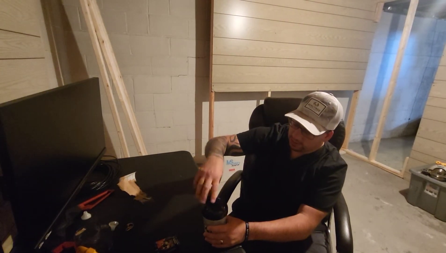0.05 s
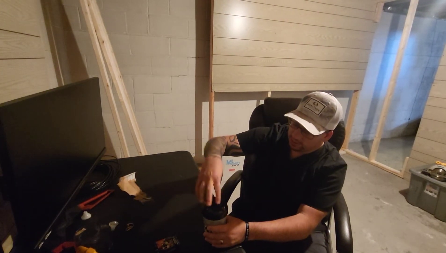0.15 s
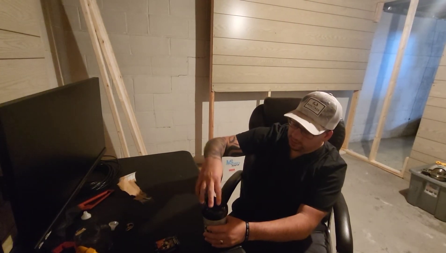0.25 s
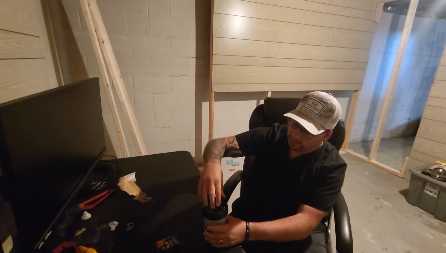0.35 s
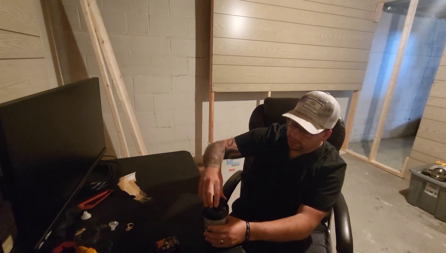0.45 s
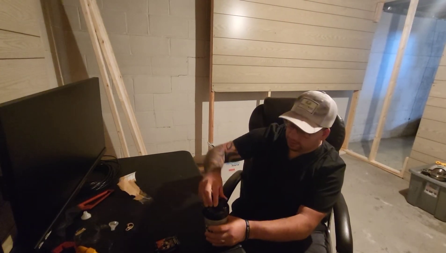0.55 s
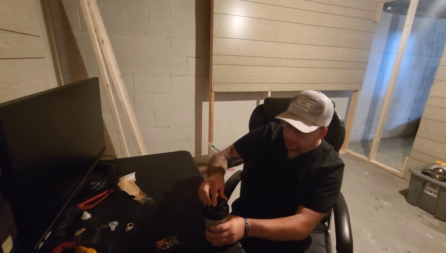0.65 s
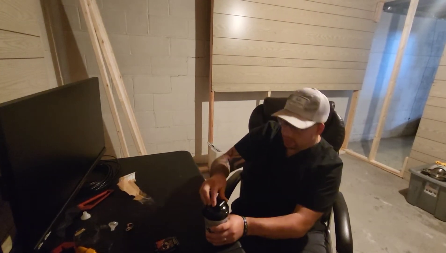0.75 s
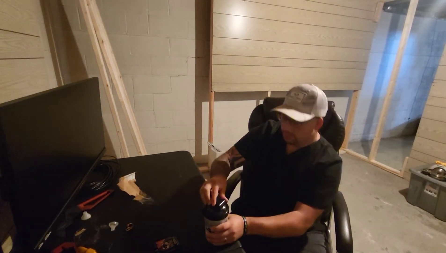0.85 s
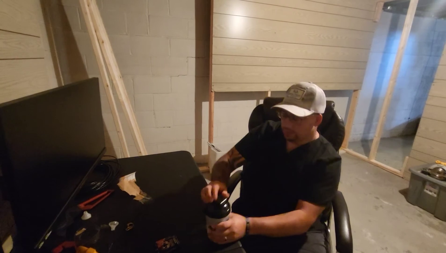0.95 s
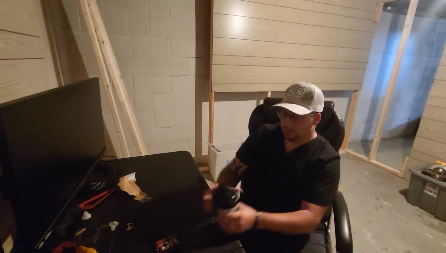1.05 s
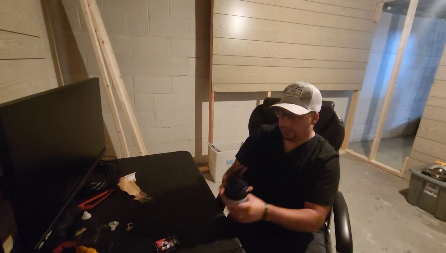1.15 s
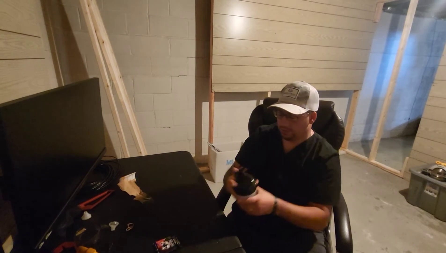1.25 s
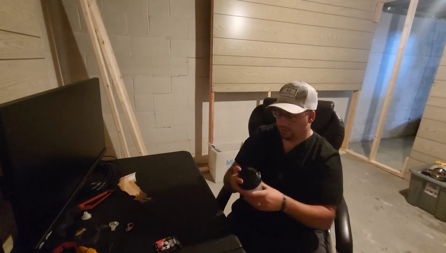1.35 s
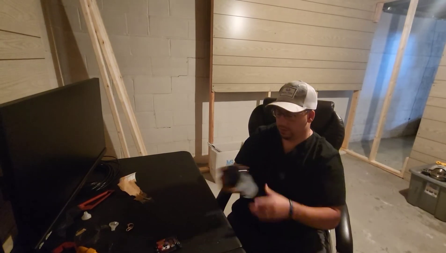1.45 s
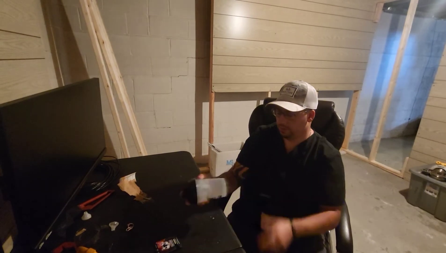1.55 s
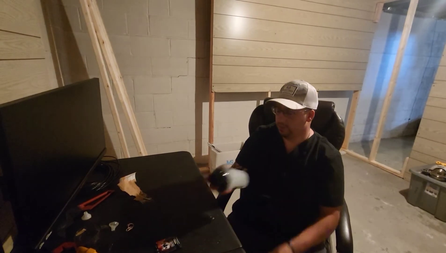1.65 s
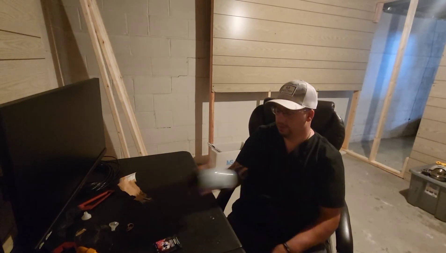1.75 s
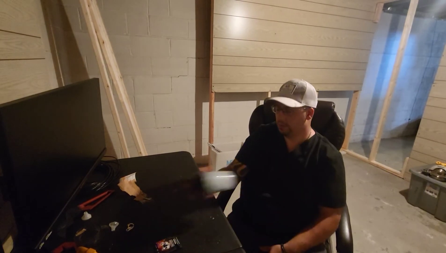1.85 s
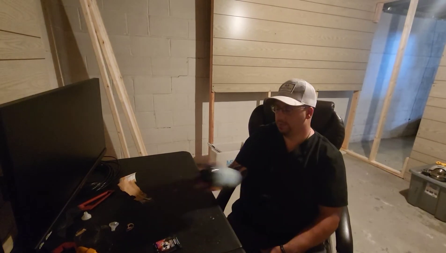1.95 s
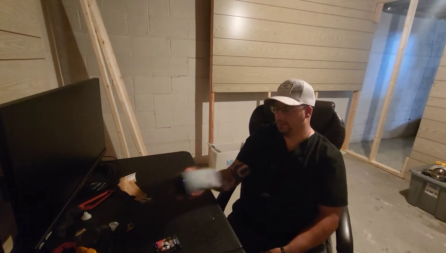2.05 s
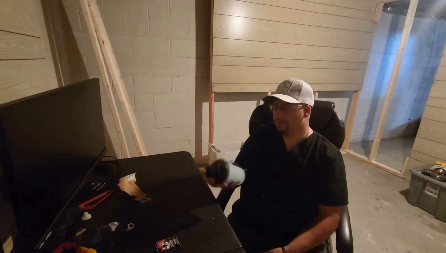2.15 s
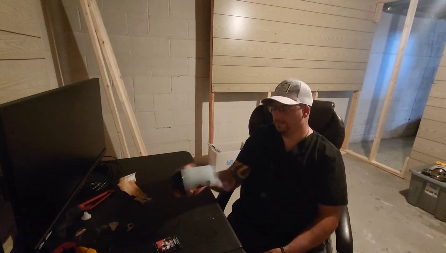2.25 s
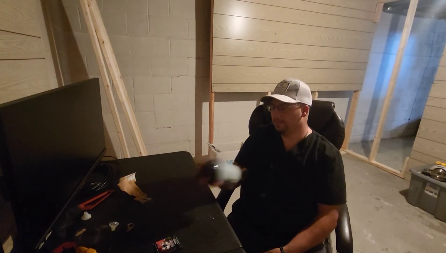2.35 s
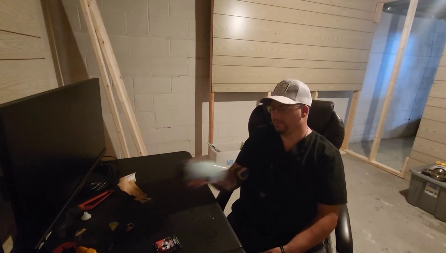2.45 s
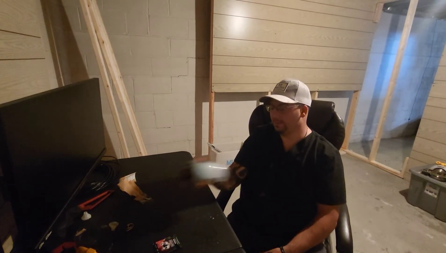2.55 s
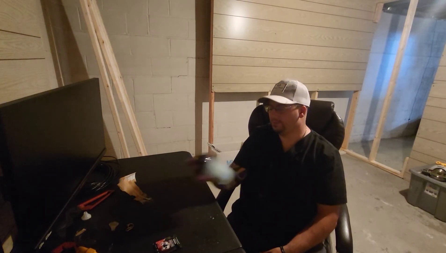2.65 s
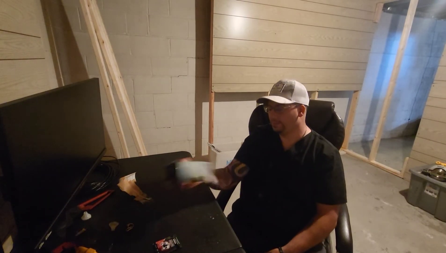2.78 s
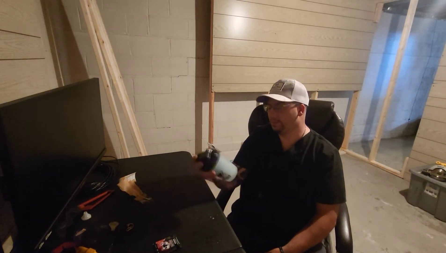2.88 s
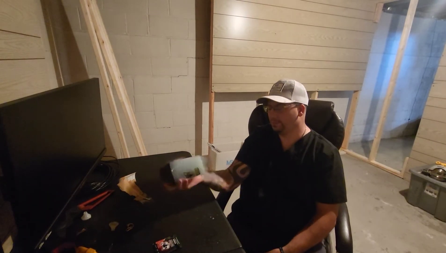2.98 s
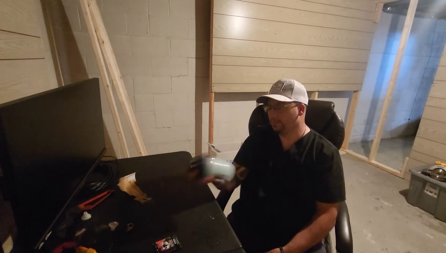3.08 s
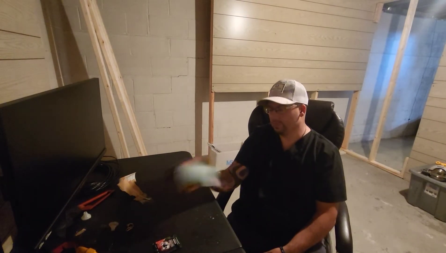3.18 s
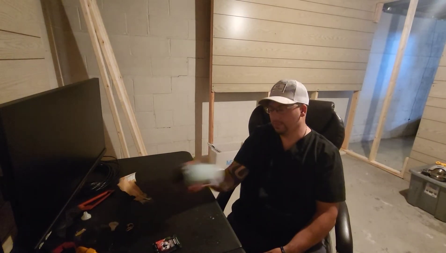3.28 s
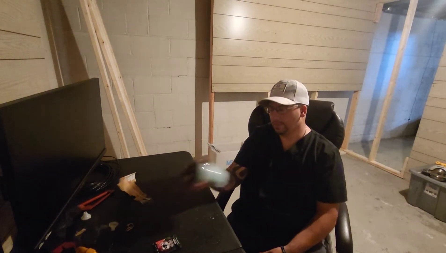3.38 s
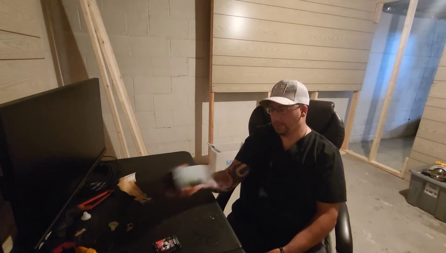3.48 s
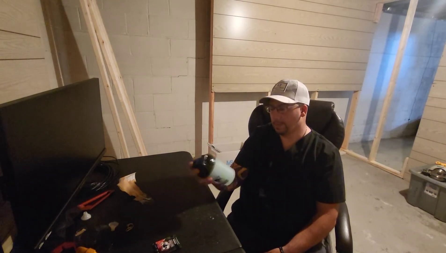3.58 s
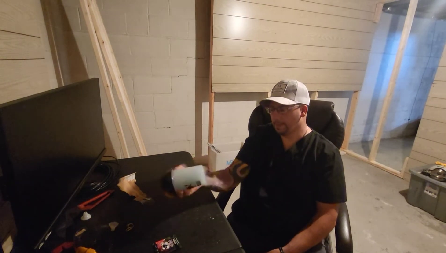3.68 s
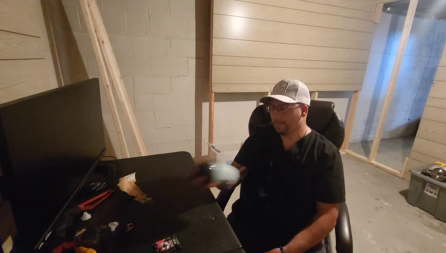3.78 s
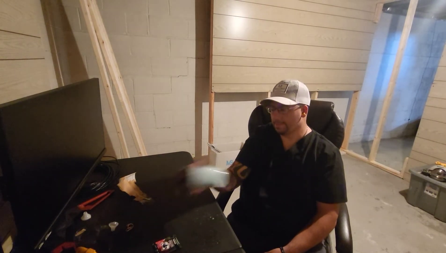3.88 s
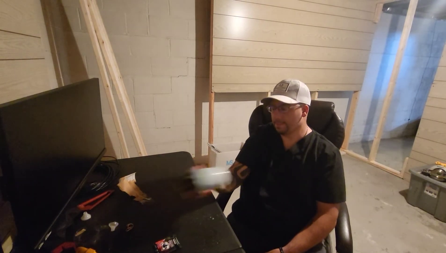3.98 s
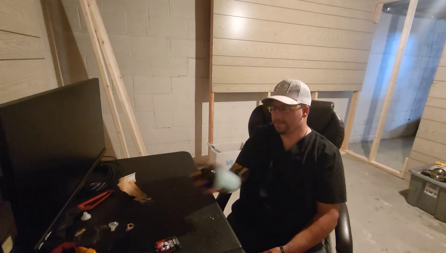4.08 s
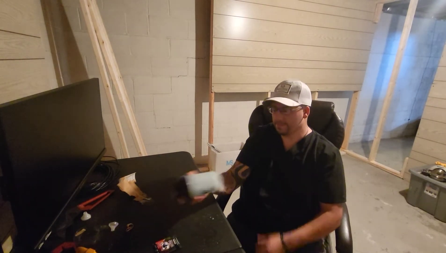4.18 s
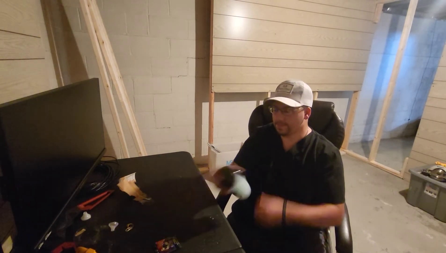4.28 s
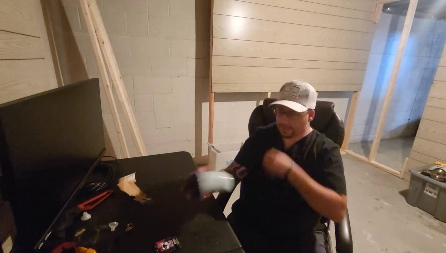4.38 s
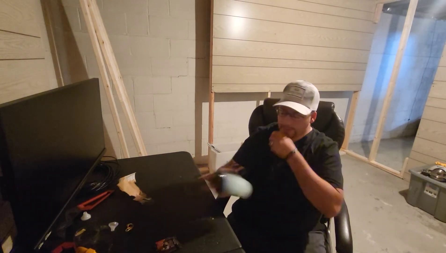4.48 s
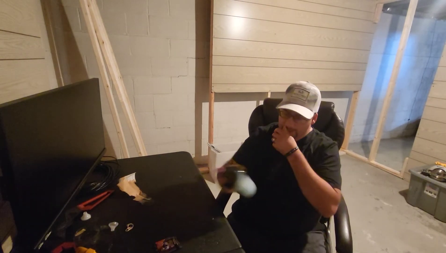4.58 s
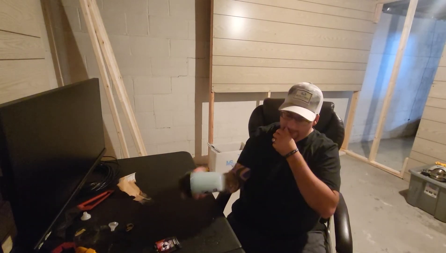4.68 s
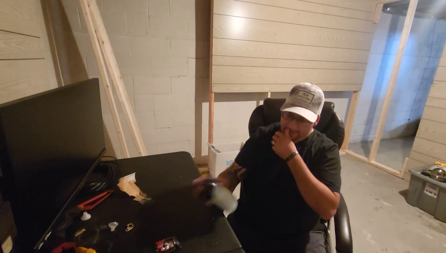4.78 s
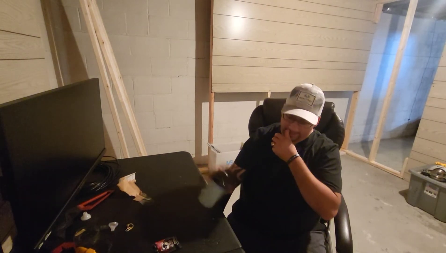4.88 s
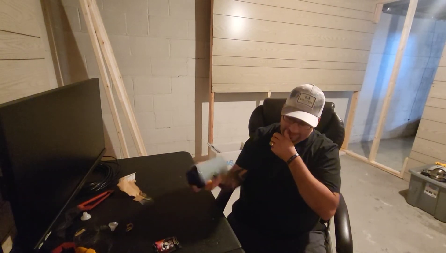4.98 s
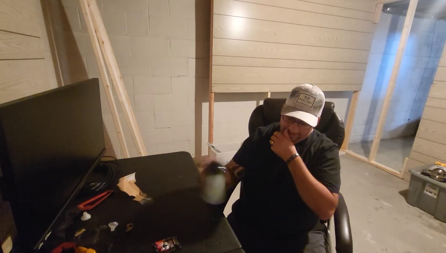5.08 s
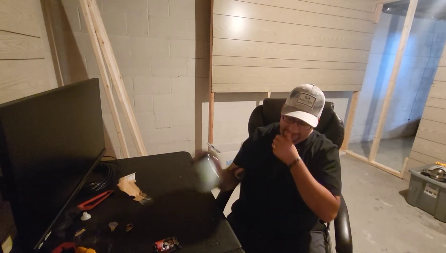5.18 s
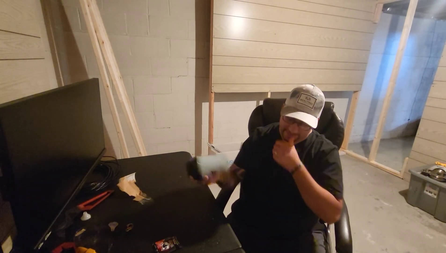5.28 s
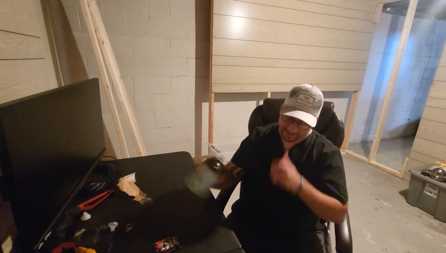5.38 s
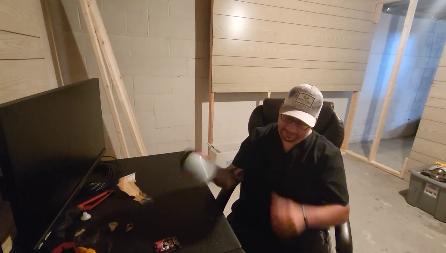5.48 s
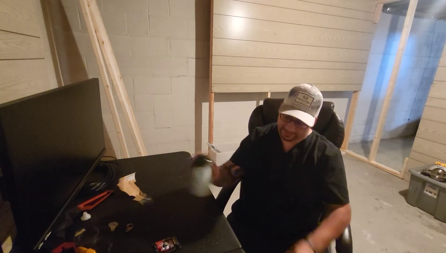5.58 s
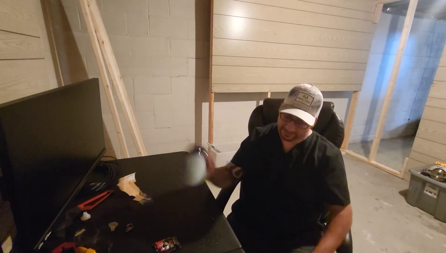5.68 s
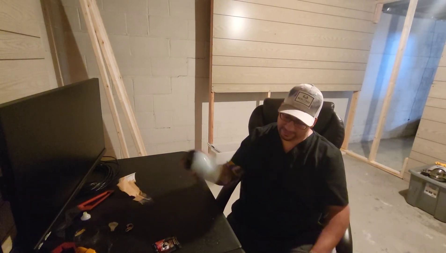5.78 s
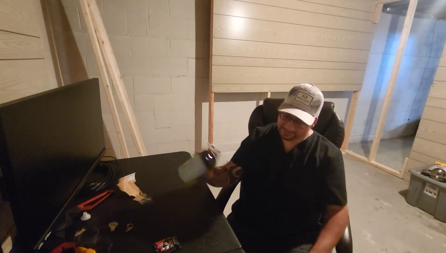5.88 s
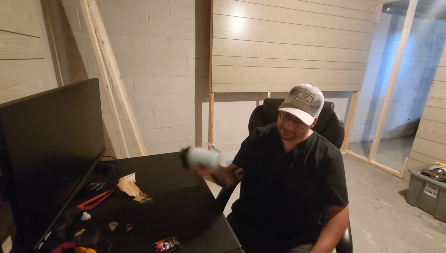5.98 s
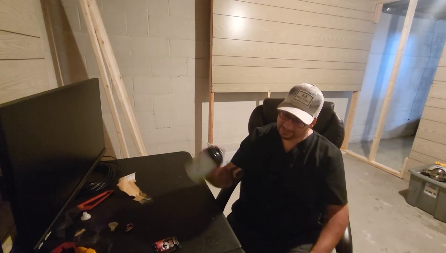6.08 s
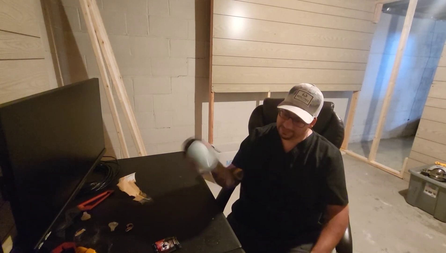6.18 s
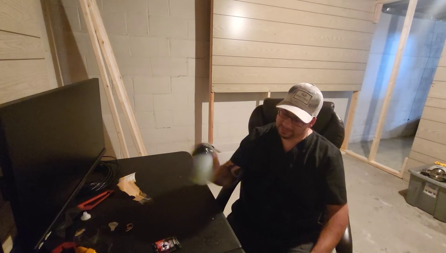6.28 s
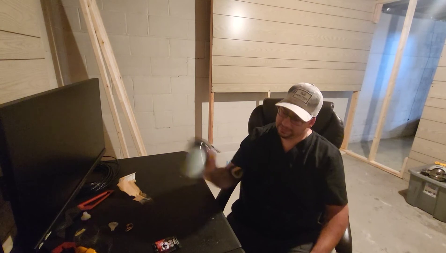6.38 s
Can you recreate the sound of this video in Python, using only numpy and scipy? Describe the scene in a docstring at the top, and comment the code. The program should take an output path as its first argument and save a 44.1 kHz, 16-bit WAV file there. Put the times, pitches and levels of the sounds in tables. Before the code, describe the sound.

Quiet handling of a plastic shaker cup gives way to vigorous shaking, with splashy liquid, bubbling gurgles, fizzing foam and sharp ball clacks.

```python
"""A drink shaken hard in a plastic cup: drop impacts spray and patter, bubbles gurgle and foam fizzes.
The mixing ball claps on the wall as struck-body taps, and big air pockets plink as gliding resonances.
Before the shaking, damped modes give dull bumps on a desk, and swelling noise gives hand strokes.
Decaying noise tails add a bare basement room, in stereo, over quiet filtered room air."""
import sys
import numpy as np
from scipy import signal
from scipy.fft import rfft, irfft, next_fast_len
from scipy.io import wavfile
from scipy.ndimage import map_coordinates

SR = 44100
rng = np.random.default_rng(int(sys.argv[2]) if len(sys.argv) > 2 else 0)


def digitize_waveform(pressure):
    """Quantize a signal to 16-bit integers and store it at the path in sys.argv[1].

    Rows of a 2-D input are taken as channels; values are limited to [-1, 1].
    """
    field = np.atleast_2d(pressure).T
    bounded = np.clip(field, -1, 1)
    quanta = np.round(bounded * 32767).astype(np.int16)
    wavfile.write(sys.argv[1], SR, quanta)


N = 284004

# Levels are relative; the layers are balanced against each other as they are mixed.
# To-and-fro strokes of the arm: (time [s], leading splash [dB], lag of the bulk [s], bulk [dB],
# backwash [dB], gurgle offset [dB])
ARM_STROKES = [(1.698, -37, 0.016, -32.5, -35.5, -7.5), (1.937, -32, 0.034, -38, -33.5, -3),
               (2.104, -28.5, 0.056, -29.5, -50, -5.5), (2.316, -33.5, 0.071, -30.5, -58, -4),
               (2.524, -33, 0.094, -29, -48, -3), (2.766, -34.5, 0.067, -31, -37.5, -1.5),
               (3.06, -25, 0.069, -29.5, -38.5, -7), (3.329, -30.5, 0.03, -37.5, -37, -4.5),
               (3.529, -28, 0.047, -35, -36.5, -1), (3.796, -32, .07, -38, -35.5, -2.5),
               (3.99, -28.5, 0.053, -35.5, -42.5, -3.5), (4.23, -33.5, 0.025, -31, -35.5, -5),
               (4.554, -35.5, 0.047, -66, -34.5, -3), (4.776, -29.5, 0.087, -35, -37.5, -9),
               (5.093, -31, 0.072, -30, -41.5, -5), (5.338, -28.5, 0.031, -32, -36.5, -5.5),
               (5.549, -30.5, 0.078, -35, -35.5, -7), (5.795, -31.5, 0.047, -33.5, -38, -6),
               (6.043, -30, 0.018, -79, -41.5, -5), (6.248, -31, 0.021, -31.5, -48, -8)]
# Spray of drops: (frequency [Hz], density [dB per Hz])
SPRAY_SPECTRUM = [(800, -36), (2400, -5), (3400, 1.5), (4200, 1.5), (5300, 0.5), (6800, -4.5),
                  (8500, -13.5), (15000, -20.5)]
# Drops on the cup wall: (frequency [Hz], density [dB per Hz])
PATTER_SPECTRUM = [(500, -45.5), (1400, -8), (1850, -2), (1990, 1.5), (2100, 0), (2350, -0.5), (2650, -3),
                   (3100, -8), (4500, -15.5), (9000, -23.5)]
# Response of the air in the cup: (frequency [Hz], level [dB])
GURGLE_RESPONSE = [(50, -29), (105, -20), (150, -11), (200, -5), (280, -6.5), (340, 1.5), (800, 4),
                   (1300, 9), (1440, 10.5), (1600, 6), (2500, 5), (6000, -52.5)]
# Fine foam: (frequency [Hz], density [dB per Hz])
FIZZ_SPECTRUM = [(3000, -33), (6500, -1), (8500, 2), (10500, 8.5), (15000, -1)]
# Hardest contacts on the plastic, fingers at first and then the mixing ball:
# (time [s], level [dB], centre frequency [Hz])
HARD_CONTACTS = [(0.4504, -60.5, 5030), (0.9198, -46.5, 2310), (1.0668, -35, 2260), (1.2673, -33.5, 2630),
                 (1.3079, -41, 5450), (1.4117, -36.5, 5190), (1.54, -30.5, 2210), (1.5828, -32.5, 3420),
                 (1.6696, -28, 2130), (1.7481, -11.5, 2580), (1.9496, -11, 2750), (2.1221, -8.5, 3870),
                 (2.1931, -12.5, 2000), (2.2391, -18, 2000), (2.3046, -11.5, 2400), (2.369, -9, 2220),
                 (2.5304, -12.5, 3900), (2.603, -12, 2020), (2.6529, -20, 2100), (3.0711, -10.5, 2070),
                 (3.1176, -13, 2490), (3.1783, -12, 4640), (3.4322, -12.5, 3120), (3.8043, -24, 1980),
                 (4.0042, -12, 2140), (4.2394, -15, 1950), (4.2682, -12, 5580), (4.3912, -15.5, 2480),
                 (4.6805, -9.5, 5100), (4.8223, -12.5, 3920), (4.847, -13, 2110), (4.9252, -14.5, 2470),
                 (5.015, -15.5, 3100), (5.1106, -12, 4670), (5.2669, -12, 2260), (5.3474, -14, 3500),
                 (5.946, -14.5, 1840), (6.0505, -10.5, 2260)]
# Plastic cup when struck: (frequency [Hz], density [dB per Hz])
CLACK_SPECTRUM = [(50, -47), (170, -28), (500, -9.5), (1500, -2.5), (2000, 2.5), (3200, 3), (5300, 5),
                  (7000, -7), (8500, -16), (15000, -11.5)]
# Big trapped air pockets: (time [s], level [dB], pitch [Hz], 60 dB decay time [s])
AIR_POCKETS = [(1.7, -30, 481, .045), (1.969, -4, 2720, 0.012), (2.153, -15.5, 1040, 0.0058),
               (2.9848, -9.5, 1100, .008), (3.197, -5.5, 1290, 0.0061), (3.4811, -9, 1150, 0.0039),
               (4.57, -5, 2630, 0.011), (4.583, -10.5, 2610, 0.016), (6.068, -6.5, 2440, .012),
               (6.077, -10, 2560, .016)]
# Soft bumps against the desk: (time [s], level [dB], damping corner [Hz])
DESK_BUMPS = [(0.0, -32.5, 400), (0.036, -37, 400), (0.995, -42, 700), (1.021, -24.5, 1000),
              (1.058, -30, 200), (1.166, -42, 102)]
# Modes of the desk: (frequency [Hz], level [dB], 60 dB decay time [s])
DESK_MODES = [(67.1, -9, 0.88), (106, -2.5, 0.21), (130, 7.5, 0.083), (143.6, 8, 0.15), (243, 2, 0.045),
              (375, -4.5, 0.079), (620, -8, 0.024), (790, -2, 0.036), (1290, 7, 0.019)]
# Strokes of the hands and the sliding cup: (time [s], swell [s], scuff [dB], swish [dB])
HAND_STROKES = [(0.0, 0.01, -36.5, -39.5), (.035, 0.031, -42.5, -49), (.14, 0.02, -47, -55.5),
                (.45, .04, -81, -75.5), (.53, 0.079, -71, -72), (.64, 0.094, -67, -64),
                (.918, .02, -67, -70), (0.991, 0.036, -45.5, -58), (1.08, 0.027, -38, -47),
                (1.212, 0.017, -62, -52), (1.263, 0.035, -58, -55), (1.421, .019, -63, -51.5),
                (1.548, 0.038, -134, -55.5)]
# Low scuff of sliding: (frequency [Hz], density [dB per Hz])
SCUFF_SPECTRUM = [(30, -27), (68, 6.5), (90, 3.5), (150, 0.5), (380, 1.5), (900, -6.5), (1400, -11),
                  (2500, -41), (6000, -36)]
# Bright swish of sliding: (frequency [Hz], density [dB per Hz])
SWISH_SPECTRUM = [(800, -10.5), (2000, -5.5), (3500, -9), (5400, -4.5), (8500, -20), (15000, -21.5)]
# Reverberation of the room: (frequency [Hz], 60 dB decay time [s])
ROOM_DECAY = [(80, 0.58), (400, 0.48), (2500, 0.51), (6000, 0.36), (14000, 0.32)]
# Likeness of left and right in the room sound: (frequency [Hz], correlation [-1 to 1])
ROOM_LIKENESS = [(130, 0.66), (280, 0.99), (640, 0.37), (1400, -0.15), (15000, -0.21)]
# Room air: (frequency [Hz], density [dB per Hz])
AIR_SPECTRUM = [(25, -5.5), (65, -7), (140, -2.5), (250, -27), (500, -22), (1500, -36), (5000, -34),
                (15000, -32)]
# Phase by which the left channel leads in the direct sound: (frequency [Hz], lead [rad])
LEFT_LEAD = [(120, 0.21), (300, 0.67), (950, 1.33), (1500, 1.14), (2000, 0.58), (2800, 1.4), (15000, 0.96)]
# Colour difference of the microphone ports: (frequency [Hz], left minus right [dB])
PORT_BALANCE = [(60, 0), (110, 2.5), (200, 0.5), (380, 0), (700, -0.5), (1290, -1.5), (2380, 0),
                (4400, 4.5), (8120, -2), (15000, -2)]

SPLASH_SWELL_S, BULK_SWELL_S, BACKWASH_SWELL_S = 0.021, 0.026, 0.043  # time each part takes to peak
RETURN_SHARE = 0.57  # the drink falls back this far through a shake
BACKWASH_DULL_DB = 0.5  # the drink that falls back sprays less
PATTER_DB, PATTER_DB_PER_S = 2.5, -1.48  # offset; patter softens as the drink thickens with foam
GURGLE_GROWTH, FOAM_GROWTH = 0.89, 1.63  # dB of sound for each dB of a throw
CHURN_DB = -45.5  # once shaken, the drink never quite rests
RATTLE_DB, RATTLE_PER_S = -11, 55  # gain and rate of light touches of the mixing ball
FOAM_SPREAD_DB = 16
TOP_HZ = 15600  # band limit


def drink():
    """Superposition: throws modulate drop impacts, bubbles, foam and light touches of the ball."""
    start, swell, level_db, dull_db, air_db = throws()
    churn = amp(CHURN_DB) * (np.arange(N) / SR > start[0])
    clumps_db = 2.5 * wobble(230)  # shared by spray, patter and gurgle

    def grown(growth):
        return level_db.mean() + growth * (level_db - level_db.mean())

    def flow(throw_db):
        own_db = 2.5 * wobble(310)
        return np.hypot(surges(start, swell, throw_db), churn) * unit(amp(clumps_db + own_db))

    patter_db = level_db + PATTER_DB + PATTER_DB_PER_S * (start - start[0])
    foam = surges(start, 0.72 * swell, grown(FOAM_GROWTH) - dull_db)
    foam = foam * unit(amp(6.0 * wobble(80)))  # uneven spurts
    liquid = spray(flow(level_db - dull_db)) + patter(flow(patter_db))
    liquid = liquid + gurgle(flow(grown(GURGLE_GROWTH) + air_db)) + fizz(foam)
    return liquid + rattle(surges(start, swell, level_db))


def throws():
    """Inertia: splash, then bulk, hit the lid and backwash hits the base; lists all their settings."""
    start, splash_db, lag, bulk_db, backwash_db, gurgle_db = np.transpose(ARM_STROKES)
    period = np.append(np.diff(start), np.diff(start).mean())
    starts = np.concatenate([start, start + lag, start + RETURN_SHARE * period])
    swells = np.repeat([SPLASH_SWELL_S, BULK_SWELL_S, BACKWASH_SWELL_S], len(start))
    levels_db = np.concatenate([splash_db, bulk_db, backwash_db])
    dull_db = np.repeat([0, 0, BACKWASH_DULL_DB], len(start))
    return starts, swells, levels_db, dull_db, np.tile(gurgle_db, 3)


def spray(flow):
    """Shot noise: dense random drop impacts, filtered by the spray spectrum."""
    return amp(1.2) * coloured(drops(rate=3200, spread_db=6), SPRAY_SPECTRUM, flow)


def patter(flow):
    """Impact excitation: sparser drops ring the cup wall."""
    return amp(-0.52) * coloured(drops(rate=1500, spread_db=7), PATTER_SPECTRUM, flow)


def gurgle(flow):
    """Bubble resonance: a swarm of decaying tones drives the air in the cup."""
    swarm = bubbles(centre_hz=801, octaves=1.0, cycles=7.6, rise=0.21, spread_db=4.0)
    return amp(-0.7) * coloured(swarm, GURGLE_RESPONSE, flow)


def fizz(foam):
    """Shot noise of fine foam: impulses of widely varied size, strongest after hard throws."""
    return amp(-14.5) * coloured(drops(rate=5200, spread_db=FOAM_SPREAD_DB), FIZZ_SPECTRUM, foam)


def rattle(motion):
    """Impact excitation: the jostled ball touches the plastic lightly at random."""
    touches = drops(rate=RATTLE_PER_S, spread_db=7.5)
    return amp(RATTLE_DB) * radiated(coloured(touches, CLACK_SPECTRUM, motion))


def bubbles(centre_hz, octaves, cycles, rise, spread_db, count=6000):
    """Bubble oscillation: each short damped sine rises in pitch as it dies."""
    start, pitch, size = rng.integers(0, N, count), rng.standard_normal(count), rng.standard_normal(count)
    hz = np.clip(centre_hz * 2 ** (octaves * pitch), 120, 4000)[:, None]
    k = np.arange(SR // 60)
    age = hz * k / SR / cycles  # 1 when the bubble has decayed by 60 dB
    envelope = amp(spread_db * np.clip(size, -2, 2)[:, None] - 60 * age)
    ring = envelope * np.sin(2 * np.pi * cycles * age * (1 + rise * age))
    return np.bincount((start[:, None] + k).ravel(), (ring * np.sqrt(hz)).ravel())[:N]


def drops(rate, spread_db):
    """Poisson-like impacts: impulses of random sign and size, rate a second on average."""
    hits = rng.random(N) < rate / SR
    sizes = amp(spread_db * np.clip(rng.standard_normal(N), -2, 2))
    return hits * rng.choice([-1, 1], N) * sizes


def clacks(focus_db=5.0, octaves=0.27, scatter=0.8, scatter_t60=0.0096,
           wall_hz=1995, wall_t60=0.035, wall_db=-8):
    """Modal excitation: tap and chatter favour each spot's band; spots tuned near the wall ring it."""
    track, t = np.zeros(N), np.arange(SR // 20) / SR
    for s, db, centre_hz in HARD_CONTACTS:
        def favour(hz):
            return np.exp(-0.5 * (np.log2((hz + 1) / centre_hz) / octaves) ** 2)

        chatter = rng.standard_normal(len(t)) * amp(-60 * t / scatter_t60)
        force = (t == 0) + 2 * scatter * chatter / np.linalg.norm(chatter)
        body = struck(lambda hz: along(CLACK_SPECTRUM, hz) + focus_db * favour(hz))
        tap = signal.fftconvolve(force, body)[:len(t)]
        wall_decay = amp(wall_db - 60 * t / wall_t60)
        ring = favour(wall_hz) ** 4 * wall_decay * np.sin(2 * np.pi * wall_hz * t)
        add(track, s + 0.0007, amp(db - 0.5) * (tap / np.abs(tap).max() + ring))
    return track


def pockets(attack=0.00055, breakup=2.2, shard_db=-8.0, octaves=0.173, glide=0.11, count=8):
    """Bubble resonance: a pocket rings with rising pitch, then splits into weaker, detuned bubbles."""
    track, t = np.zeros(N), np.arange(SR // 10) / SR
    for s, db, hz, t60 in AIR_POCKETS:
        sweep = t * (1 + glide * (t / t60 - 0.5) / 2)
        envelope = amp(db - 60 * t / t60) * (1 - np.exp(-t / attack))

        def ring(pitch):
            return envelope * np.sin(2 * np.pi * pitch * sweep)

        add(track, s, amp(-1.0) * ring(hz))
        lateness = (np.arange(count) + 1 + rng.random(count)) / count
        for late, detune in zip(lateness, rng.standard_normal(count)):
            shard = amp(shard_db - 17.0 * late) * ring(hz * 2 ** (octaves * detune))
            add(track, s + breakup * t60 * late, shard)
    return track


def handling():
    """Contact and friction: bumps on the desk add to the sliding of hands and cup."""
    return bumps() + rubs()


def bumps(contact_db=-3):
    """Modal excitation: a soft push rings the damped modes of the desk, less above its corner."""
    track, t = np.zeros(N), np.arange(SR // 2) / SR
    for s, db, corner_hz in DESK_BUMPS:
        ring = np.zeros(len(t))
        for k, (hz, level_db, t60) in enumerate(DESK_MODES):
            decay = amp(level_db + 2 * rng.standard_normal() - 60 * t / t60)
            mode = decay / np.hypot(1, hz / corner_hz) * np.sin(2 * np.pi * hz * t)
            ring += (-1) ** k * mode
        u = 2 * np.pi * corner_hz * t
        push = 2 * u * (2 - u) * np.exp(-u)  # a harder contact is a shorter push
        add(track, s, amp(db + 1.0) * (ring / np.abs(ring).max() + amp(contact_db) * push))
    return track


def rubs():
    """Friction noise: random small impacts are filtered into scuff and swish and swell by stroke."""
    s, swell, scuff_db, swish_db = np.transpose(HAND_STROKES)
    scuff = surges(s, swell, scuff_db) * coloured(drops(rate=1800, spread_db=6), SCUFF_SPECTRUM)
    swish = surges(s, swell, swish_db) * coloured(drops(rate=2000, spread_db=0.5), SWISH_SPECTRUM)
    return scuff + swish


def radiated(x, corner_hz=260):
    """Radiation efficiency: a small cup gives off hardly any bass."""
    return signal.sosfilt(signal.butter(3, corner_hz, "highpass", fs=SR, output="sos"), x)


def room(x, count=80):
    """Time-varying reverberation: each overlapping stretch of sound gets its own fresh random reflections."""
    wet, hop = np.zeros((2, N)), N // count
    fade = np.sin(np.pi * np.arange(2 * hop) / (2 * hop))  # overlapping stretches keep their total power
    for start in range(-hop, N, hop):
        a, b = max(start, 0), min(start + 2 * hop, N)
        stretch = x[a:b] * fade[a - start:b - start]
        for channel, tail in zip(wet, room_tail()):
            add(channel, a / SR, signal.fftconvolve(stretch, tail))
    return pair(wet, ROOM_LIKENESS)


def room_tail(build=0.0015, early=1.7, early_s=0.0026):
    """Exponential decay: noise stands for near desk and bare walls, with energy 1 in each channel."""
    hz, t, z = signal.stft(rng.standard_normal((2, int(SR * 0.6))), SR, nperseg=256)
    decay = amp(-60 * t / along(ROOM_DECAY, hz)[:, None])
    tail = signal.istft(z * decay, SR, nperseg=256)[1]
    age = np.arange(tail.shape[1]) / SR
    tail *= (1 - np.exp(-age / build)) * (1 + early * np.exp(-age / early_s))
    return tail / np.linalg.norm(tail, axis=1, keepdims=True)


def room_air():
    """Stationary noise: the quiet air of the room, partly alike in the two channels."""
    noise = [coloured(rng.standard_normal(N), AIR_SPECTRUM) for channel in range(2)]
    return pair(np.array(noise), ROOM_LIKENESS)


def pair(x, alike):
    """Interchannel correlation: blends two unrelated signals to a given left-right likeness."""
    def turn(hz):
        return np.arccos(np.clip(along(alike, hz), -1, 1)) / 2

    mid, side = filtered(x, lambda hz: np.array([np.cos(turn(hz)), np.sin(turn(hz))]))
    return np.array([mid + side, mid - side])


def surges(times, swells, levels_db):
    """Power addition: the envelope of pushes that each swell and drain."""
    power, t = np.zeros(N), np.arange(SR // 2) / SR
    for s, swell, db in zip(times, swells, levels_db):
        age = t / max(swell, 0.003)
        add(power, s, (amp(db) * age * np.exp(1 - age)) ** 2)
    return np.sqrt(power)


def wobble(rate):
    """Band-limited fluctuation: a smooth random curve of rms 1, rate knots a second."""
    knots = rng.standard_normal(int(N * rate / SR) + 4)
    return unit(map_coordinates(knots, [np.arange(N) * rate / SR]))


def coloured(x, spectrum, drive=1):
    """Source-filter principle: driven x passes through a body, scaled to rms 1 at drive 1."""
    body = struck(lambda hz: along(spectrum, hz))
    return signal.fftconvolve(x * drive, body)[:N] / np.std(signal.fftconvolve(x, body))


def struck(shape_db, size=2048):
    """Minimum phase: the causal impulse response of a body with the given dB response."""
    cepstrum = irfft(np.log(amp(shape_db(np.fft.rfftfreq(size, 1 / SR)))))
    cepstrum[1:size // 2] *= 2
    cepstrum[size // 2 + 1:] = 0
    return irfft(np.exp(rfft(cepstrum)))


def filtered(x, response):
    """Linear filtering: x times a complex response of frequency."""
    size = next_fast_len(x.shape[-1] + 8192)
    spectrum = rfft(x, size) * response(np.fft.rfftfreq(size, 1 / SR))
    return irfft(spectrum, size)[..., :x.shape[-1]]


def along(points, hz):
    """Logarithmic frequency: interpolates (frequency, value) points on a log axis."""
    f, v = np.transpose(points)
    return np.interp(np.log(hz + 1), np.log(f), v)


def add(track, s, sound):
    """Superposition: mixes a sound into the track at s seconds."""
    start = max(round(s * SR), 0)
    track[start:start + len(sound)] += sound[:N - start]


def unit(x):
    """Normalisation: x at rms 1."""
    return x / np.sqrt(np.mean(x ** 2) + 1e-20)


def amp(db):
    """Level law: decibels to amplitude gain."""
    return 10 ** (np.asarray(db) / 20)


def scene():
    """Superposition of the direct sound, its reflections and the room air."""
    liquid, taps, plinks, hands = drink(), radiated(clacks()), radiated(pockets()), handling()
    direct = amp(-3) * liquid + amp(1.5) * taps + amp(1.0) * plinks + amp(-3.0) * hands
    sides = np.array([[1], [-1]])  # left leads, right lags
    direct = filtered(direct, lambda hz: np.exp(0.5j * along(LEFT_LEAD, hz) * sides))
    reflected = room(amp(-4.0) * liquid + amp(1.5) * taps + amp(1.5) * plinks + amp(-8.5) * hands)
    return direct + reflected + amp(-73.5) * room_air()


def record(dry):
    """Transducer response: two microphone ports differ in colour, and the band limit cuts the top."""
    halves = np.array([[0.5], [-0.5]])
    return filtered(dry, lambda hz: amp(along(PORT_BALANCE, hz) * halves) * (hz < TOP_HZ))


dry = scene()
out = record(dry)
digitize_waveform(out)
```